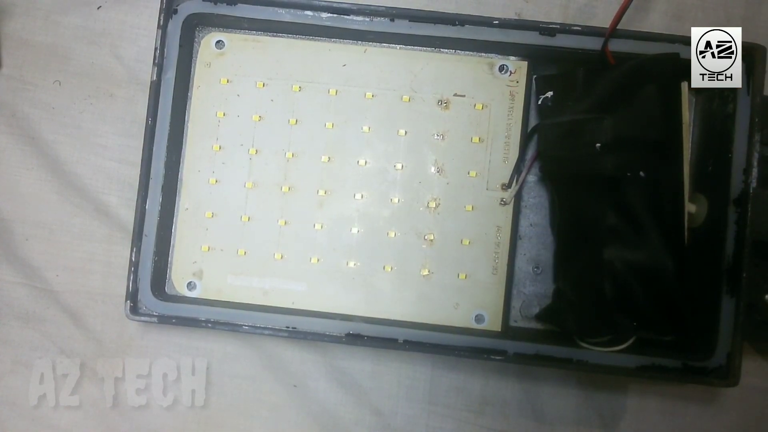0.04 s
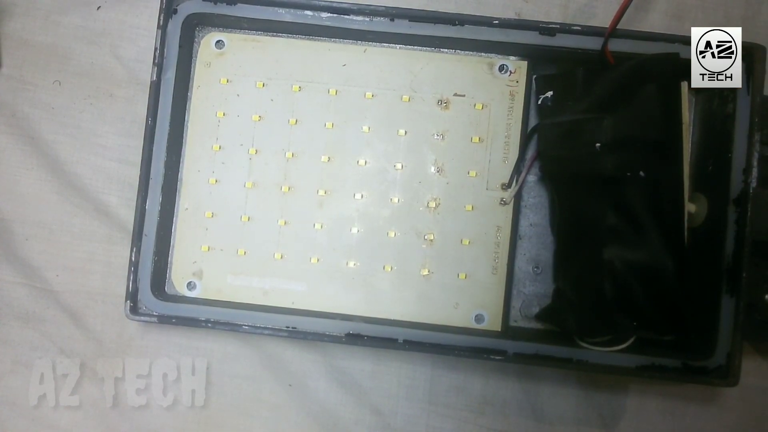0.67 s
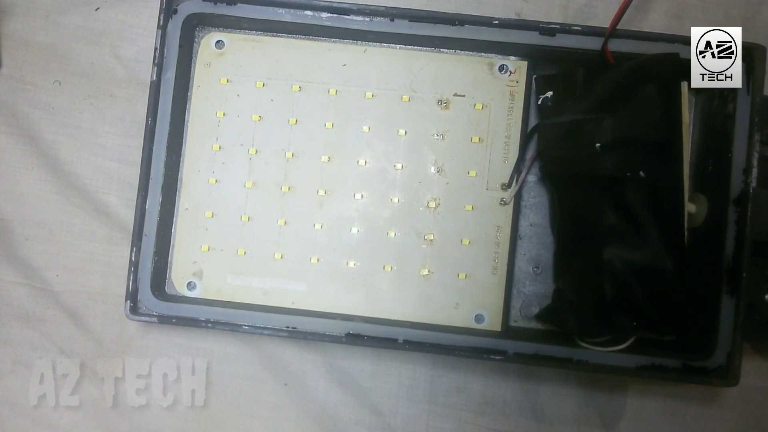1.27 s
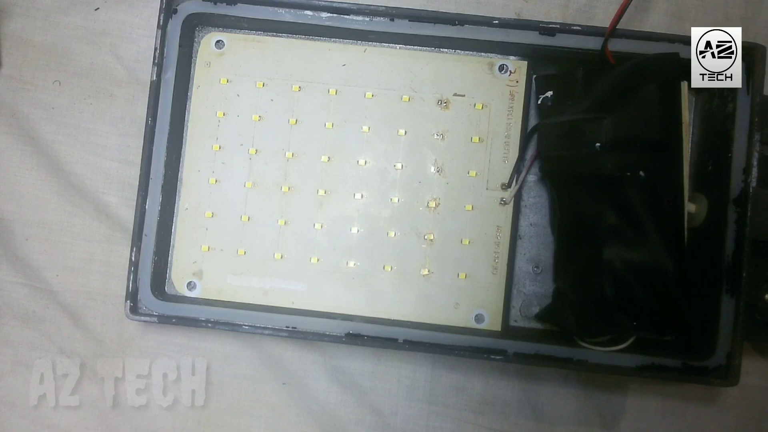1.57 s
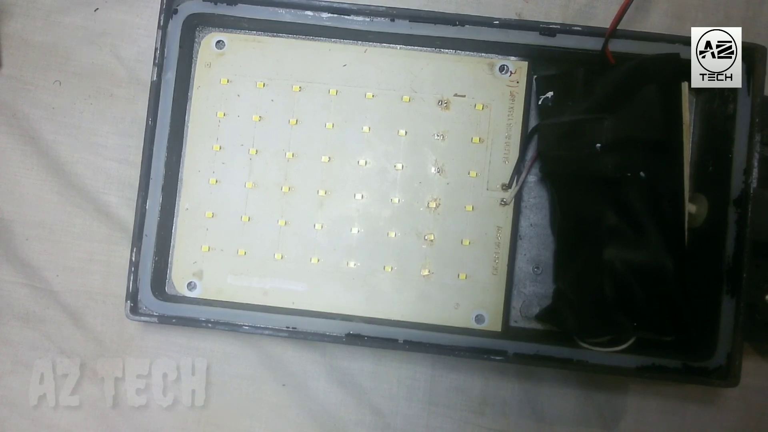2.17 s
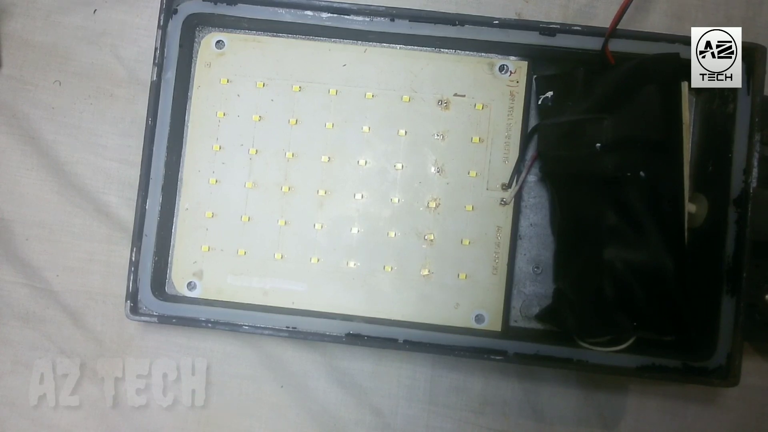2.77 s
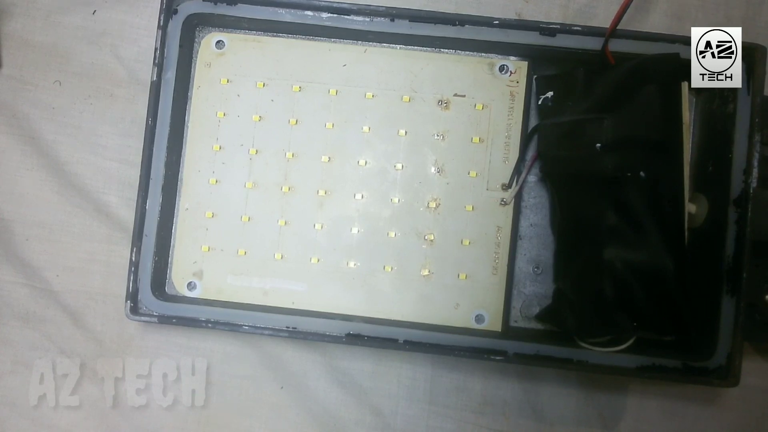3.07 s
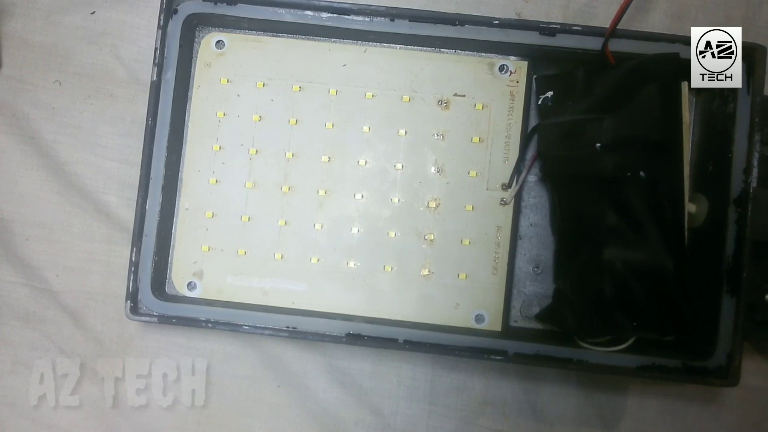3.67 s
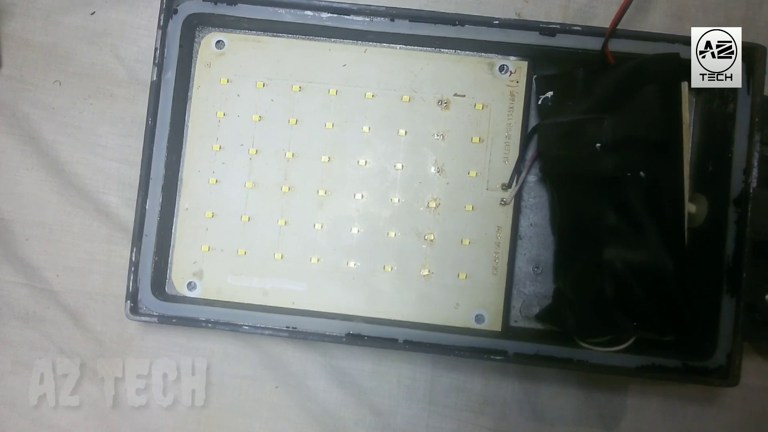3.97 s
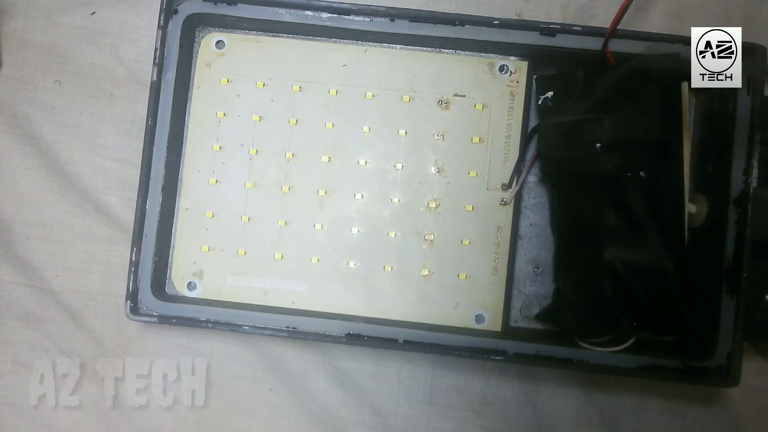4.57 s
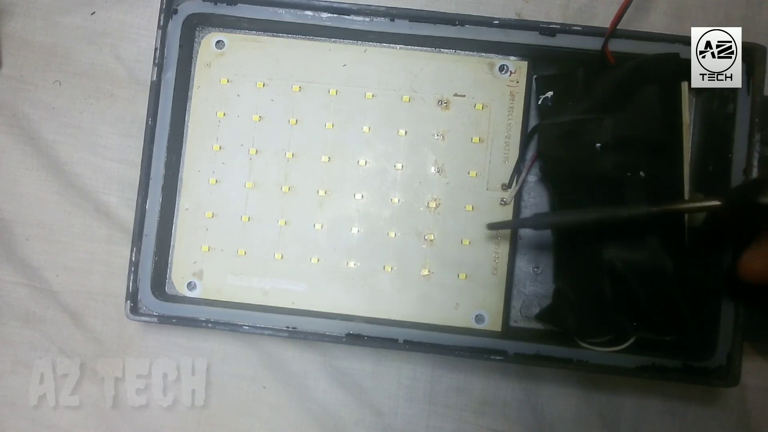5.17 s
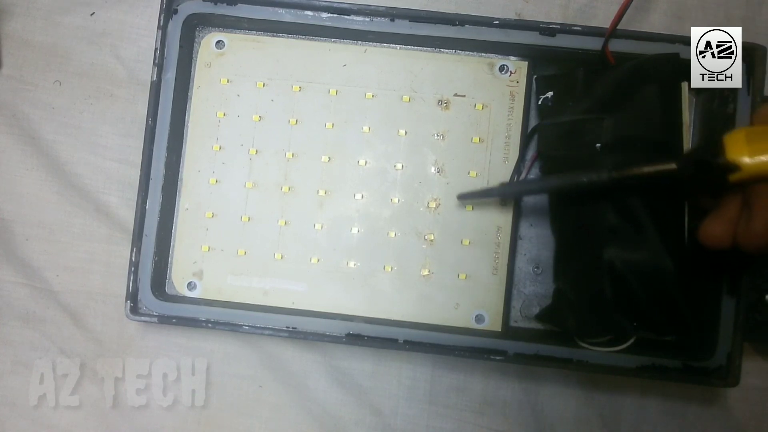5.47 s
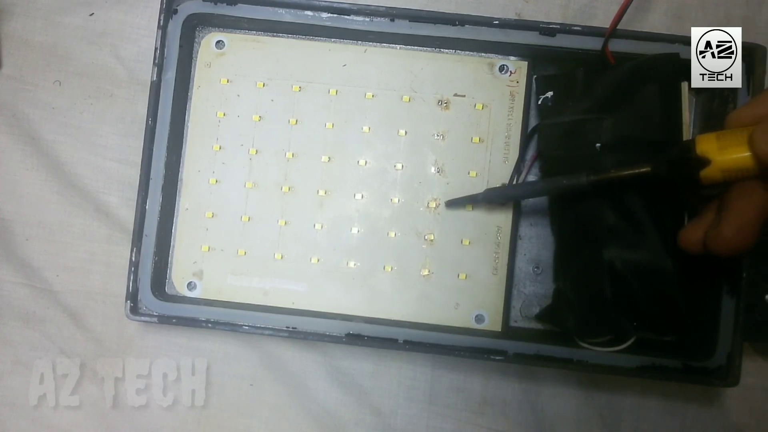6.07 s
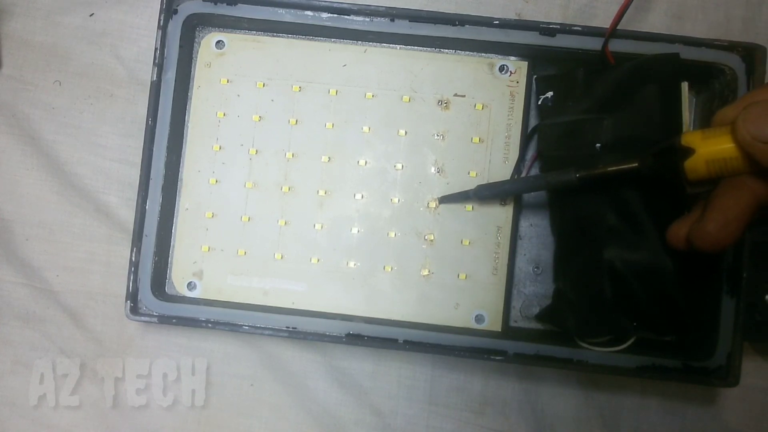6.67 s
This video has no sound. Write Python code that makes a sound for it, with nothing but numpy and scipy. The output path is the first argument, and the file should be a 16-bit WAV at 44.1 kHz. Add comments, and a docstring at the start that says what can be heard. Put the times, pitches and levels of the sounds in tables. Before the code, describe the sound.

Short scrapes and sharp knocks of something shifted on a workbench, over a continuous chorus of crickets and a low rumble.

```python
"""Crickets sing outside a small hard-walled room at night, as sandals scuff across the floor. Their wing
strokes make falling 3 kHz syllables: a chorus swells and ebbs, with one cricket nearer and higher insects
behind it. The feet slide in short stick-slip scuffs, and something knocks as it is set down, ringing in its
modes. Light taps and a soft rustle follow, over a low rumble and hiss."""
import sys
import numpy as np
from scipy import signal
from scipy.fft import rfft, irfft, next_fast_len
from scipy.io import wavfile
from scipy.ndimage import uniform_filter1d

SR = 44100
rng = np.random.default_rng(int(sys.argv[2]) if len(sys.argv) > 2 else 0)


def unload_wav(signal):
    """Save mono or channel-first audio to the path in sys.argv[1] as 16-bit WAV at rate SR, clipped to [-1, 1]."""
    wavfile.write(
        sys.argv[1],
        SR,
        np.round(np.clip(np.atleast_2d(signal).T, -1, 1) * 32767).astype(np.int16),
    )


N = 301203

# one slow swell of the rumble, the hiss and the distant insects: (time [s], level [dB])
SLOW_SWELL = [(0, 1), (.25, 3.5), (.48, 0), (.9, 3), (1.6, -1), (1.98, -0.5), (2.13, -3), (2.42, 1.5),
              (2.66, -.8), (2.88, 1), (3.2, 1), (3.7, 3.5), (4.3, 0), (4.98, 2.5), (5.65, -1.2), (6.06, 3),
              (6.4, -2.5), (6.83, 0.1)]


def near_cricket(second_stroke_db=-1.1, second_stroke_hz=-24.5):
    """Interference: paired strokes, the second softer and lower, beat against their own echoes."""
    # two-stroke chirps: (middle of first stroke [s], gap to second [s], level [dB], pitch [Hz])
    chirps = [(0.062, 0.082, -36.5, 3134), (0.547, 0.086, -46, 3174), (.693, 0.083, -35, 3200),
              (1.093, 0.072, -45.5, 3140), (1.599, 0.082, -44, 3160), (1.902, 0.084, -37.5, 3182),
              (2.273, 0.092, -40, 3133), (2.6, 0.09, -50, 3070), (2.832, .079, -36, 3210),
              (3.605, .09, -38.5, 3260), (3.832, .084, -32.5, 3210), (4.675, .08, -39, 3214),
              (4.877, 0.088, -31.5, 3250), (5.79, 0.072, -45, 3336), (5.914, 0.085, -32, 3195),
              (6.501, 0.094, -46.5, 3176)]
    out = np.zeros(N)
    for s, gap, db, hz in chirps:
        for k in (0, 1):
            stroke = syllable(hz + k * second_stroke_hz, length_s=0.054, fall=0.069)
            add(out, s + k * gap - len(stroke) / SR / 2, from_db(db + k * second_stroke_db) * stroke)
    return out + from_db(-5.5) * reflections(out, t60=0.22)


def chorus(trill_db=-50.5, trill_hz=3170, low_hz=2832, low_db=4.5, low_db_per_hz=-0.0552):
    """Incoherent sources add in power: far chirps rise and fall over an unbroken trill."""
    # blurred chirps: (middle [s], length [s], level [dB], pitch [Hz])
    chirps = [(0.054, 0.25, -42, 3204), (0.222, 0.28, -39.5, 3140), (0.55, 0.12, -43.5, 3060),
              (0.648, 0.16, -45, 3230), (0.863, .2, -52, 3040), (1.152, 0.155, -47, 3023),
              (1.39, 0.18, -39.5, 3135), (1.712, 0.29, -51.5, 3090), (1.947, 0.22, -48, 3136),
              (2.333, .18, -45.5, 3170), (2.448, 0.13, -42, 3180), (2.55, 0.17, -48.5, 3350),
              (2.696, 0.18, -47.5, 3070), (2.863, 0.33, -45, 3216), (3.077, 0.24, -47.5, 3070),
              (3.2, 0.14, -45.5, 3150), (3.618, 0.21, -42, 3260), (3.746, 0.27, -42, 3054),
              (4.024, 0.16, -43, 3084), (4.143, 0.12, -46, 3320), (4.305, 0.22, -48, 3020),
              (4.46, 0.21, -54, 3280), (4.626, 0.16, -40.5, 3170), (4.746, 0.15, -40.5, 3170),
              (4.936, 0.35, -39.5, 3153), (5.22, 0.25, -46.5, 3140), (5.528, 0.31, -45.5, 3105),
              (5.705, 0.052, -44.5, 3330), (5.784, 0.2, -43, 3160), (5.909, 0.21, -40.5, 3250),
              (6.044, 0.25, -39.5, 3080), (6.226, 0.21, -49, 3320), (6.74, 0.22, -47, 3060),
              (6.83, .13, -43, 3290)]
    t = np.arange(N) / SR
    parts = [(from_db(trill_db + 0.87 * in_time(SLOW_SWELL)), trill_hz)]
    for s, length, db, hz in chirps:
        arch = np.cos(np.pi * np.clip((t - s) / length, -.5, .5))
        parts.append((from_db(db) * arch, hz))
    power = sum(gain ** 2 for gain, hz in parts)
    pitch = sum(gain ** 2 * hz for gain, hz in parts) / power
    # the low voices join less, the further a chirp lies above them
    low_power = sum((gain * from_db(low_db + low_db_per_hz * (hz - low_hz))) ** 2 for gain, hz in parts)
    high = voices(pitch, spread=0.0631, fall=0.116, top_hz=3760)
    low = voices(np.full(N, low_hz), spread=0.0453, fall=0.092, top_hz=3260)
    return np.sqrt(power) * high + np.sqrt(low_power) * low


def voices(pitch, spread, fall, top_hz, strokes=2000):
    """Superposition: detuned strokes of far crickets and their echoes merge into a trill; rms about 1."""
    out = np.zeros(N)
    starts = np.linspace(0, N - 1, strokes).astype(int)
    for i, (late, detune, size) in zip(starts, rng.uniform(-1, 1, (strokes, 3))):
        stroke = syllable(pitch[i] * (1 + spread * detune), length_s=0.0297, fall=fall)
        add(out, i / SR - .02 + .008 * late, from_db(2.5 * size) * stroke)
    out = out + 0.46 * reflections(out, t60=0.13)
    out = signal.sosfiltfilt(signal.butter(24, top_hz, fs=SR, output="sos"), out)
    local_power = uniform_filter1d(out ** 2, size=2800)
    return out / np.sqrt(local_power + 1e-12)


def syllable(hz, length_s, fall):
    """Stridulation: the file slows as the wings close, so the tone falls; rms 1 at mid-stroke."""
    u = np.linspace(-.5, .5, max(int(length_s * SR), 8))
    cycles = np.cumsum(hz * (1 - fall * u)) / SR + rng.random()
    return np.sqrt(2) * np.cos(np.pi * u) ** 2 * np.sin(2 * np.pi * cycles)


def scuffs(rub_exponent=1.72, hiss_exponent=1.4):
    """Stick-slip friction: rubbing, resonances and hiss grow as powers of the sliding speed."""
    # slides: (start [s], attack [s], hold [s], release [s], friction level [dB], hiss level [dB])
    slides = [(-.02, 0.17, 0.11, 0.18, -35, -44.5), (0.673, 0.083, 0.049, 0.063, -31.5, -40),
              (0.784, 0.077, 0.071, 0.087, -25.5, -32.5), (1.071, 0.21, 0.041, 0.054, -29, -38),
              (1.289, 0.074, 0.038, 0.081, -35, -38), (3.207, 0.055, 0.027, 0.097, -38.5, -54),
              (3.287, .15, 0.057, .14, -23.5, -36)]
    # resonances that sliding excites: (frequency [Hz], t60 [s], level [dB])
    modes = [(276, 0.034, -6.5), (495, 0.012, -3.5), (753, 0.011, -3), (1030, 0.034, 1.5), (1168, 0.33, 7),
             (1398, 0.04, -3), (2027, 0.038, -1)]
    # spectrum of the rubbing: (frequency [Hz], level [dB])
    rub_spectrum = [(71, -39), (120, -6), (474, -19.5), (689, -1), (956, 1), (1070, -21), (1170, -4),
                    (1270, -11), (1390, -7.5), (1810, -4.5), (1990, -13), (2400, -8), (3180, -5),
                    (3660, -11), (5000, -18), (6500, -39), (11000, -120)]
    # spectrum of the sliding hiss: (frequency [Hz], level [dB])
    hiss_spectrum = [(2000, -25), (3200, 2.5), (4500, 1.5), (6500, 2), (8500, -2.5), (11000, -9.5),
                     (14000, -28)]
    slips = grit(spread_db=6.5)
    hollow = sum((-1) ** k * from_db(db) * ring(slips, hz, t60) for k, (hz, t60, db) in enumerate(modes))
    rub = 0.62 * coloured(grit(spread_db=3.0), rub_spectrum) + from_db(-5.5) * rms_one(hollow)
    hiss = coloured(grit(spread_db=-0.5), hiss_spectrum)
    catching = from_db(1.2 * drift(per_s=54))   # all of them catch and slip together
    t, out = np.arange(N) / SR, np.zeros(N)
    for start, attack, hold, release, rub_db, hiss_db in slides:
        speed = np.interp(t, start + np.cumsum([0, attack, hold, release]), [0, 1, 1, 0])
        out += from_db(rub_db) * speed ** rub_exponent * rub
        out += from_db(hiss_db) * speed ** hiss_exponent * hiss
    return out * catching


def knocks(touch_db=19.5, crack_db=3.5, crack_t60=0.13, room_db=-7.5):
    """Impact excitation: a touch, a clatter and ringing modes, in a band set by the contact's hardness."""
    # knocks and taps: (time [s], level [dB], low edge [Hz], high edge [Hz], clatter t60 [s], ringing [0-1])
    blows = [(.309, -31.5, 850, 1680, 0.25, 0.29), (.312, -33, 140, 242, 0.2, .1),
             (.833, -13, 1120, 1510, 0.11, 0.39), (1.265, -4.5, 754, 3250, 0.05, 0.41),
             (1.2825, -20.5, 694, 4700, 0.064, 0.082), (1.562, -41.5, 605, 6000, 0.095, 0.3),
             (1.805, -49, 700, 4000, .05, .2), (3.034, -44, 1400, 3000, .041, .1),
             (3.356, -17.5, 513, 1210, 0.21, 0.33), (3.395, -19, 238, 327, 0.14, 0.4),
             (3.417, -20.5, 586, 2200, 0.066, 0.45), (3.707, -37, 1360, 2980, 0.18, .1),
             (4.234, -29.5, 304, 404, 0.072, .2), (4.236, -37.5, 650, 1070, 0.039, .18),
             (4.425, -40, 250, 800, 0.05, .2), (4.478, -40.5, 350, 1200, 0.063, .22),
             (4.508, -44, 5600, 7200, .07, .1), (5.275, -43, 5200, 6820, .06, .1)]
    # modes of the struck object: (frequency [Hz], level [dB], t60 [s])
    body = [(289, -11, .25), (524, -17, .25), (736, -12, .3), (808, -19, .25), (1086, -11, .18),
            (1148, -10, .22), (1368, -19, .18), (1655, -17, .13), (1900, -13, .12), (2040, -16, .12),
            (2336, -7, .16), (2775, -14, .17), (3042, -12, .11), (3390, -18, .12), (3516, -15, .13),
            (4175, -13, .07), (5443, -14, .08), (5726, -13, .13)]
    out, t = np.zeros(N), np.arange(SR // 2) / SR
    for s, db, low_hz, high_hz, t60, ringing in blows:
        contact_hz = low_hz, np.clip(high_hz, 1.1 * low_hz, 15000)
        touch = from_db(touch_db) * (t == 0)
        clatter = band_pass(rng.standard_normal(len(t)) + touch, *contact_hz)
        clatter = clatter / np.std(clatter[t < .02]) * from_db(-3.5 - 60 * t / t60)
        modes = sum(from_db(mode_db - 60 * t / life) * np.sin(2 * np.pi * hz * t) * rng.choice([-1, 1])
                    for hz, mode_db, life in body)
        crack = band_pass(rng.standard_normal(len(t)), 900, 7500)
        crack *= from_db(crack_db - 60 * t / crack_t60) * (1 - np.exp(-t / 0.0017))
        blow = (1 - ringing / 2) * clatter + ringing * band_pass(modes, *contact_hz)
        blow += ringing ** 2 * crack   # hard, ringing blows crack the most
        add(out, s, from_db(db) * blow)
    return out + from_db(room_db) * reflections(out, t60=0.18)


def rustle():
    """Cloth friction: an arm bringing in a tool makes dull noise, with low bumping underneath."""
    # envelope of the movement: (time [s], level [dB])
    envelope = [(4.6, -88), (4.95, -59), (5.35, -53.5), (5.7, -61.5), (6.07, -50), (6.25, -54.5),
                (6.45, -83)]
    # spectra: (frequency [Hz], level [dB])
    cloth_spectrum = [(260, -2), (430, 16), (560, 10), (800, -35), (1700, -7), (2150, 5), (2600, -34)]
    bump_spectrum = [(50, -12), (75, 6.5), (120, -10), (170, 5.5), (230, -25)]
    friction = coloured(grit(spread_db=1.5), cloth_spectrum)
    bumping = coloured(rng.standard_normal(N), bump_spectrum)
    return from_db(in_time(envelope)) * (friction + bumping)


def high_cricket(period_s=0.2518, stroke_gap_s=0.035, pitch_hz=4350):
    """Periodic stridulation: chirps of three steeply falling strokes, over a haze of far crickets."""
    # envelope of the song: (time [s], level [dB])
    envelope = [(0, -63), (.3, -71), (.8, -60), (1.76, -64), (2.01, -52), (3.02, -52.5), (3.27, -48.5),
                (3.78, -46.5), (4.03, -68), (4.28, -53.5), (5.04, -51.5), (6.83, -58)]
    # spectrum of the haze: (frequency [Hz], level [dB])
    haze_spectrum = [(3800, -29), (4150, -0.5), (4420, -4), (4650, -2.0), (5000, -9.0)]
    out = np.zeros(N)
    for s in np.arange(0, N / SR, period_s):
        db = np.interp(s, *np.transpose(envelope))
        for k in (-1, 0, 1):
            stroke = syllable(pitch_hz * (1 + 0.0174 * rng.standard_normal()), length_s=0.0384, fall=0.218)
            add(out, s - .03 + k * stroke_gap_s, from_db(db + 2 * rng.uniform(-1.1, 1)) * stroke)
    haze = coloured(rng.standard_normal(N), haze_spectrum)
    out = out + from_db(-3.5) * reflections(out, t60=0.13)
    haze_db = -60 + 1.8 * in_time(SLOW_SWELL) + 3.0 * drift(per_s=16)
    return out + from_db(haze_db) * haze


def thin_insect(pitch_hz=8480, period_s=0.1036):
    """Reverberation smears a train of faint, very high pips, nearly ten a second."""
    out = np.zeros(N)
    for s in np.arange(.078, N / SR, period_s):
        pip = syllable(pitch_hz * (1 + 0.0049 * rng.standard_normal()), length_s=0.046, fall=0.056)
        add(out, s - .028, from_db(-62.5 + 1.5 * rng.standard_normal()) * pip)
    return out + from_db(2.0) * reflections(out, t60=.13)


def far_trills():
    """Narrow-band noise: distance blurs these trills into bands that swell and fade."""
    # far insects: (pitch [Hz], bandwidth [Hz], start [s], end [s], level [dB])
    trills = [(6210, 110, 2.0, 6.8, -65), (7470, 300, 4.6, 4.93, -58.5), (4150, 120, 5.5, 6.35, -60.5),
              (4420, 77, 2.6, 9.4, -63), (3600, 35, 2.79, 3.02, -57), (3420, 68, 5.6, 6.4, -59)]
    t, out = np.arange(N) / SR, np.zeros(N)
    for hz, width, start, end, db in trills:
        progress = np.clip((t - start) / (end - start), 0, 1)
        swell = np.sqrt(np.abs(np.sin(np.pi * progress)))
        band = band_pass(rng.standard_normal(N), hz - width / 2, hz + width / 2)
        out += from_db(db) * swell * rms_one(band)
    return out


def background(rumble_db=-49, hiss_db=-52):
    """Amplitude modulation: one slow swell carries the rumble of the surroundings and a fine hiss."""
    # spectrum of the rumble: (frequency [Hz], level [dB])
    rumble_spectrum = [(13, -50), (22, -13), (27, -13), (49, -2), (108, 0.5), (219, 0), (256, -2.5),
                       (294, -2), (350, -5), (410, -5.5), (561, -7.5), (815, -10), (1280, -13),
                       (2400, -16.5), (3120, -40), (5280, -120)]
    # spectrum of the hiss: (frequency [Hz], level [dB])
    hiss_spectrum = [(1500, -19), (2500, 1), (3800, 3.5), (5300, -0.5), (6200, 2.5), (7000, 0), (9000, 1.5),
                     (11000, -2), (14500, -4)]
    rumble = from_db(rumble_db) * coloured(rng.standard_normal(N), rumble_spectrum)
    hiss = from_db(hiss_db) * coloured(rng.standard_normal(N), hiss_spectrum)
    return from_db(in_time(SLOW_SWELL)) * (rumble + hiss)


def reflections(x, t60):
    """Reverberation: dense echoes start after the nearest wall and decay exponentially; unit energy gain."""
    t = np.arange(SR) / SR
    tail = rng.standard_normal(SR) * from_db(-60 * t / t60) * (t > .004)
    return signal.fftconvolve(x, tail / np.linalg.norm(tail))[:N]


def grit(spread_db):
    """Friction noise: countless tiny slips of uneven size."""
    return rng.standard_normal(N) * from_db(spread_db * np.minimum(rng.exponential(1, N), 5))


def ring(x, hz, t60):
    """Damped resonance, with gain 1 at its peak."""
    r = from_db(-60 / (t60 * SR))
    feedback = [1, -2 * r * np.cos(2 * np.pi * hz / SR), r * r]
    return signal.lfilter([(1 - r * r) / 2, 0, (r * r - 1) / 2], feedback, x)


def band_pass(x, low_hz, high_hz):
    """Band-pass filtering, with skirts of 12 dB per octave."""
    return signal.sosfilt(signal.butter(2, [low_hz, high_hz], "band", fs=SR, output="sos"), x)


def coloured(x, spectrum):
    """Spectral shaping by a curve that falls 20 dB per octave beyond its ends; rms 1."""
    hz, db = np.transpose(spectrum)
    size = next_fast_len(N)
    octave = np.log2(np.maximum(np.fft.rfftfreq(size, 1 / SR), 1))
    outside = np.abs(octave - np.clip(octave, np.log2(hz[0]), np.log2(hz[-1])))
    gain = from_db(np.interp(octave, np.log2(hz), db) - 20 * outside)
    return rms_one(irfft(rfft(x, size) * gain, size)[:N])


def drift(per_s):
    """Random modulation: straight lines between chance values of spread 1."""
    knots = rng.standard_normal(4000)
    return np.interp(np.arange(N) / SR * per_s, np.arange(len(knots)), knots)


def in_time(curve):
    """Linear interpolation of a curve at every sample."""
    return np.interp(np.arange(N) / SR, *np.transpose(curve))


def add(track, s, sound):
    """Superposition of a sound on a track from time s on."""
    i = int(round(s * SR))
    first, last = max(i, 0), min(i + len(sound), N)
    if last > first:
        track[first:last] += sound[first - i:last - i]


def from_db(db):
    """Amplitude ratio of a level."""
    return 10 ** (np.asarray(db) / 20)


def rms_one(x):
    """Normalisation to unit power."""
    return x / np.sqrt(np.mean(x ** 2) + 1e-20)


def scene():
    """Sound pressures add at one microphone, the same in both channels."""
    insects = near_cricket() + chorus() + high_cricket() + thin_insect() + far_trills()
    mono = insects + scuffs() + knocks() + rustle() + background()
    return np.stack([mono, mono])


def record(dry):
    """Clipping holds the peaks down, and a low-pass cuts the treble above 14.7 kHz."""
    low_pass = signal.ellip(12, .1, 80, 14700, fs=SR, output="sos")
    return signal.sosfilt(low_pass, np.clip(dry, -.9, .9))


dry = scene()
out = record(dry)
unload_wav(out)
```